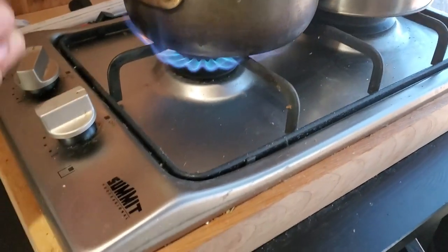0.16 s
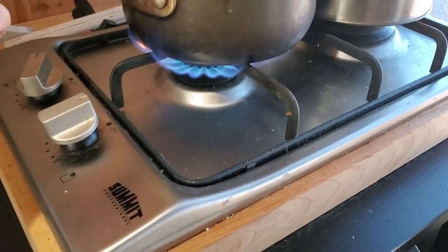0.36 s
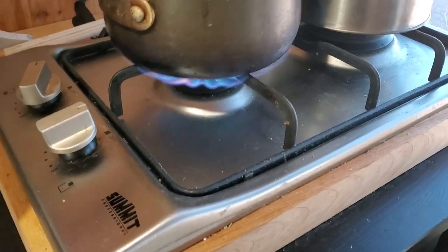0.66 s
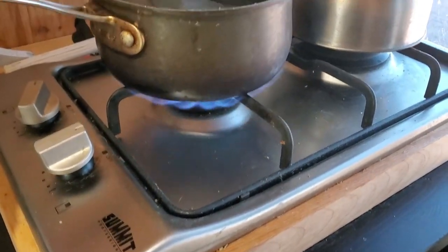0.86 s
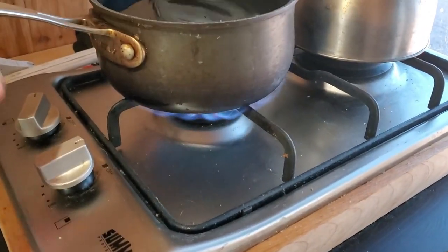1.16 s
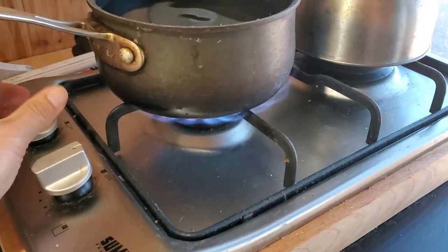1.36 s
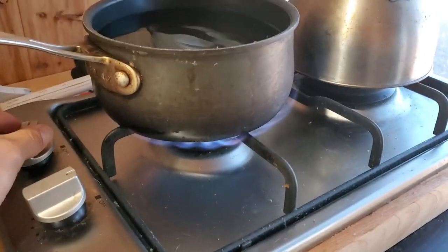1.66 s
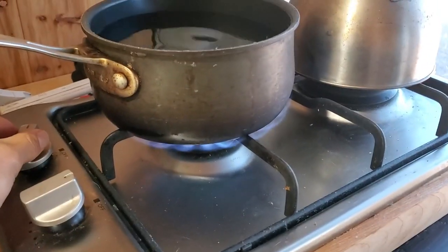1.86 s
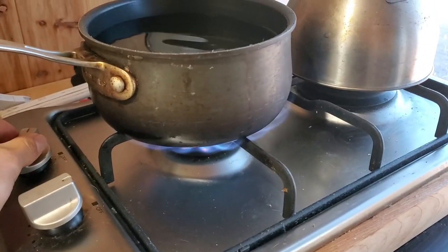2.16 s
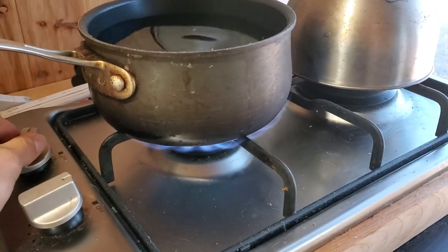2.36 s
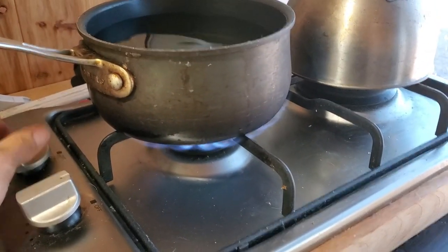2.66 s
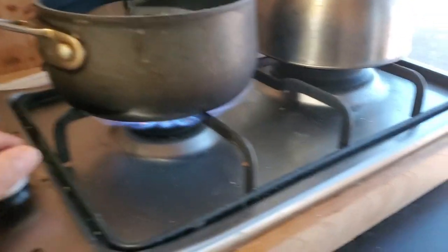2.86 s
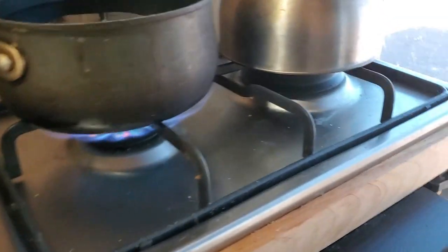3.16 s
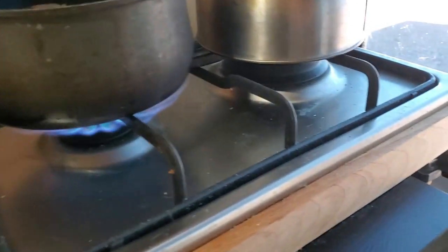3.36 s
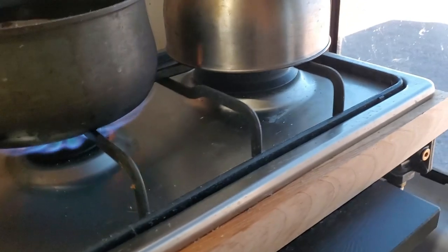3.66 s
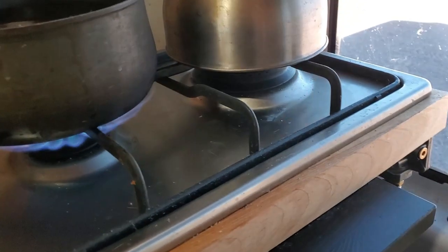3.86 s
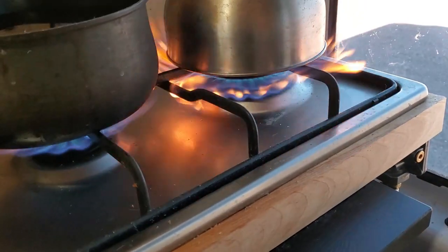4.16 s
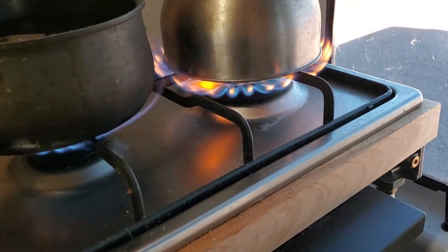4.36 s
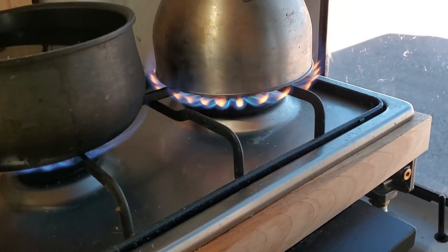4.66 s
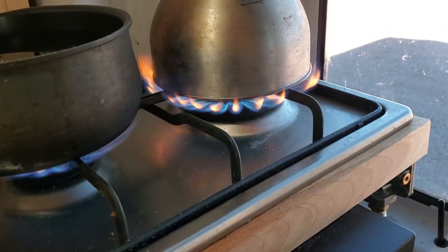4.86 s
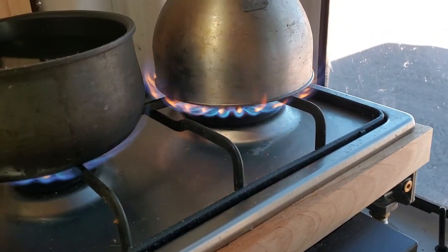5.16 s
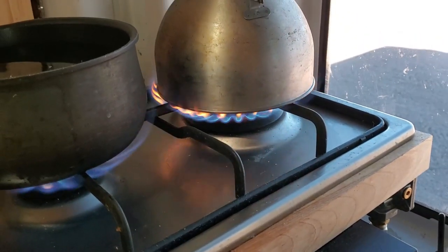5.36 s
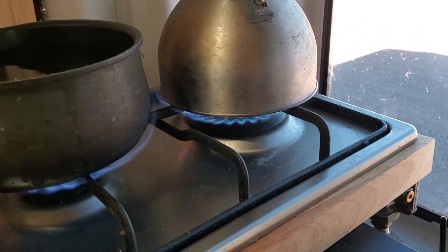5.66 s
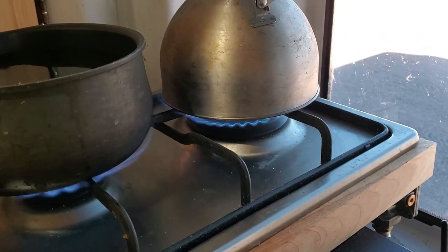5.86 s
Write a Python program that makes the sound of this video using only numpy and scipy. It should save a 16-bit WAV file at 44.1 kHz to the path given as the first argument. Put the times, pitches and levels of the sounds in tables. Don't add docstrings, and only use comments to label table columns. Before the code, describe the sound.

In a small wooden cabin, close to a gas hob, a burner gives a low fluttering rumble and faint hiss. Early hard knocks on wood ring a metal support, with a short scrape. A knob is pushed and turned with dull clunks; six sharp igniter cracks follow, gas hisses and lights with a soft whoomp. The new jet roars hollowly, then a thin whistle marks it being turned down to low flame.

```python
import sys
import numpy as np
from scipy import signal
from scipy.fft import rfft, irfft, next_fast_len
from scipy.io import wavfile
from scipy.ndimage import uniform_filter1d, map_coordinates

SR = 44100
rng = np.random.default_rng(int(sys.argv[2]) if len(sys.argv) > 2 else 0)


def transcribe(signal):
    frames = np.atleast_2d(signal).T
    limited = np.clip(frames, -1, 1)
    pcm = np.round(limited * 32767).astype(np.int16)
    wavfile.write(sys.argv[1], SR, pcm)


def makeup_ratio(level_db):
    decades = np.asarray(level_db, float) / 20
    return 10 ** decades


N = 264688
SIZE = next_fast_len(N)
FREQS_HZ = np.maximum(np.arange(SIZE // 2 + 1) * SR / SIZE, 1)

# frequency in Hz, side minus mid in dB.
WIDTH = [(30, -22), (60, -19), (120, -15), (250, -11), (500, -6), (1200, -1), (2400, 1), (5000, 0),
         (15000, 0)]

# frequency in Hz, density in dB per Hz.
RUMBLE = [(12, -47.5), (20, -14.5), (54, -0.5), (75, -1.5), (114, -8.5), (129, -15), (156, -13.5),
          (256, -25.5), (295, -24), (412, -45.5), (900, -51), (1170, -80), (1980, -120)]
HISS = [(300, -19.5), (900, -17.5), (1400, -18.5), (2600, -23), (5000, -26.5), (7000, -18.5), (9500, -20.5),
        (11000, -29.5), (14000, -24), (15600, -20.5), (17000, -29)]
TONE_FLOOR = [(1000, -51.5), (3000, -52)]
# frequency in Hz, width in Hz, level in dB.
HISS_PEAKS = [(3910, 510, -14), (6010, 160, -16), (9000, 1300, -13), (7560, 82, -23.5)]
TONE_PEAKS = [(1798, 124, 0.69)]
# time in seconds, distance in metres.
DISTANCE = [
    (0, 0.64),
    (.45, 0.33),
    (1.1, 0.4),
    (2.0, 0.4),
    (2.8, 0.6),
    (3.2, 0.19),
    (3.45, 0.81),
    (4.2, 0.56),
    (4.7, 0.7),
    (6.0, 0.92),
]
TONE_SINGS = (.45, .45, 1.955, .03)
LEAK = (2.24, 0.063, 0.21, 0.2)
HIGH_TONE_SINGS = (2.86, .04, 0.37, .15)
RUMBLE_DB, HISS_DB = -56, -74
HISS_FOLLOWS = 0.22
TONE_DB, TONE_MUTED_DB, TONE_SAG_DB_PER_S = -68.5, -15, 2.5
LEAK_DB, HIGH_TONE_DB = 2.5, -74.5

# time in seconds, level in dB, contact in seconds, bass in dB, body top in Hz.
KNOCKS = [
    (0.189, -60, 0.05, 11.5, 505),
    (0.244, -30.5, 0.027, 0, 4300),
    (0.266, -32, 0.01, -0.5, 5540),
    (0.31, -48, 0.016, 6.5, 4450),
    (1.026, -40, 0.016, 2.5, 3040),
    (1.356, -40.5, 0.024, -2.5, 900),
]
# frequency in Hz, level in dB, t60 in seconds.
WOOD = [(239.3, 1, 0.16), (313.8, 7, 0.15), (669, 0.5, 0.093), (1060, -2.5, 0.15), (2040, -5.5, 0.13),
        (3345, -6.5, 0.098)]
# low edge in Hz, high edge in Hz, level in dB.
WOOD_BANDS = [(360, 532, 10), (542, 590, 8.5), (900, 1190, 11.5), (1360, 1620, 6.5), (1760, 2140, 6.5),
              (3030, 3600, -1.5), (4130, 7700, -8)]

# time in seconds, frequency in Hz, level in dB, t60 in seconds.
PAN_SUPPORT = [
    (0.25, 2160, -40.5, 0.43),
    (0.25, 2720, -50, 0.43),
    (1.03, 640, -54.5, 0.36),
]

SLIDE = (0.28, .2, .26, 0.15)
# frequency in Hz, density in dB per Hz.
SLIDING = [(88, -34), (150, -4), (298, -1.5), (524, -23.5), (655, -15), (846, -20.5), (1190, -14.5),
           (1410, -22.5), (1800, -18.5), (2370, -24.5), (2530, -51), (3170, -32.5), (4460, -42.5),
           (6730, -32), (9000, -58), (11700, -75), (19800, -120)]
# frequency in Hz, width in Hz, level in dB.
SLIDE_PEAKS = [(301, 50, 2.0), (1180, 66, -16), (1790, 17, -7.5), (6640, 1800, -30.5)]
SLIDE_DB = -48.5

# time in seconds, level in dB, t60 in seconds, wide hiss in dB.
PUFFS = [
    (1.355, -67.5, 0.16, 6),
    (1.5, -68, .1, -7),
    (2.985, -54, 0.18, -15.5),
]
PUFF_LOW_HZ, PUFF_HIGH_HZ = 6292, 8400

# time in seconds, level in dB, contact in seconds, bass in dB, body top in Hz.
KNOB = [
    (2.8595, -37.5, 0.0027, 0.5, 4450),
    (2.866, -36, .025, 5.5, 2900),
    (3.092, -37, 0.037, 6.5, 700),
    (3.137, -27.5, 0.0094, -21.5, 2800),
    (3.15, -24.5, 0.014, -3, 2700),
    (3.172, -39.5, .02, 2.5, 2560),
    (3.25, -40.5, 0.02, -3, 2840),
    (4.44, -56, 0.036, 6.5, 900),
]
# frequency in Hz, level in dB, t60 in seconds.
HOB = [(111.6, -2, 0.055), (151, -1.5, 0.023), (190.9, 4, 0.086), (323.5, 6.5, 0.077), (690, -10.5, 0.064),
       (1036, -1.5, 0.11), (1428, -13, 0.02)]
# low edge in Hz, high edge in Hz, level in dB.
HOB_BANDS = [(400, 770, 12.5), (900, 1700, 9.5), (1580, 2350, 0.5), (2700, 9600, 8.5)]

# time in seconds, level in dB, colour at 6.5 kHz in dB, colour at 11 kHz in dB.
SPARKS = [
    (3.2102, -20.5, 2.5, -2),
    (3.4437, -20, 4, 1),
    (3.6777, -21.5, 2, -2),
    (3.9112, -19.5, 5, -1),
    (4.144, -22, -2.1, 2),
    (4.378, -26, -2, 4),
]
# frequency in Hz, density in dB per Hz.
CRACK = [(300, -61), (600, -18), (1000, -14), (1500, -14.5), (2800, -10), (4500, -10), (6400, -4.5),
         (8000, -8.5), (10000, -1), (13000, -5), (16500, -10)]
# frequency in Hz, left minus right in dB.
LEFT_LEAD = [(1000, 2.5), (3000, -3), (6500, 8.5), (10000, 2), (14000, 7)]
# frequency in Hz, level in dB, t60 in seconds.
SPARK_MODES = [(6120, -52, 0.12), (6660, -45, 0.09), (7070, -51, 0.12), (9970, -45, 0.045),
               (10670, -45, 0.03)]

# time in seconds, gas flow in dB.
FLOW = [
    (3.35, -39.5),
    (3.49, -19.5),
    (3.61, -5.5),
    (3.83, -1.5),
    (4.08, -0.5),
    (4.67, -1.5),
    (5.12, -2),
    (5.2, -5),
    (5.3, -11.5),
    (6.0, -13.5),
]
# frequency in Hz, density in dB per Hz.
ROAR = [(240, -61.5), (400, -20.5), (528, -27.5), (716, -9.5), (1120, -0.5), (1350, -15), (1900, -17.5),
        (2140, -39), (2370, -39), (3000, -30.5), (3900, -53.5), (6600, -120)]
JET_HISS = [(3000, -17.5), (4300, -24), (5200, -35), (6500, -14.5), (9000, -24.5), (11500, -11.5),
            (14000, -21), (16500, -25.5)]
# frequency in Hz, width in Hz, level in dB.
ROAR_PEAKS = [(1143, 76, 6.5), (988, 130, 0), (1850, 500, -13.5)]
JET_PEAKS = [(6730, 70, -2), (11230, 130, -5), (11750, 68, -13.5), (13580, 120, -6), (4300, 261, -8)]
ROAR_DB, JET_HISS_DB = -58.5, -64.5
JET_HISS_FOLLOWS, JET_HISS_LAG_S = 3.1, .09

# start, attack, hold, release in seconds, level in dB.
WHISTLES = [
    (3.738, .08, .07, .015, -57.5),
    (5.175, 0.027, 0.08, 0.047, -54.5),
]
WHISTLE_HZ = (11400, 11230)
WHISTLE_RATIOS = (1, 1.022, .645)
WHISTLE_SAG_HZ_PER_S, NEIGHBOUR_FADE_DB_PER_S = 2100, 113.5

WHOOSH = (3.9, .032, .173, .03)
# frequency in Hz, density in dB per Hz.
THUMP = [(22, -40.5), (38, -15.5), (70, 0.6), (108, 2.0), (160, -4.5), (300, -18.0), (600, -44.5)]
FLUTTER = [(120, -29), (250, -8.5), (600, 6.5), (1100, 1.5), (2000, -7.5), (4000, -19.5), (8000, -30)]
RUSH = [(800, -15), (2000, -7.0), (4000, 6.5), (7000, -12.0), (12000, -24)]
THUMP_DB, FLUTTER_DB, RUSH_DB, RUSH_SAG_DB_PER_S = -30, -41.5, -45.5, 88
THROB_HZ, THROB_PEAK_S, THROB_DB = 11, 3.88, 3


def in_time(rows, quiet=None):
    s, *columns = np.transpose(rows)
    return [np.interp(np.arange(N) / SR, s, c, quiet, quiet) for c in columns]


def at_hz(points, hz):
    points = np.array(points)
    return np.interp(np.log(hz), np.log(points[:, 0]), points[:, 1])


def stroke(start_s, attack_s, hold_s, release_s, depth_db):
    t = np.arange(N) / SR - start_s
    rise = t / attack_s - 1
    fall = (attack_s + hold_s - t) / release_s
    return depth_db * np.minimum(np.minimum(rise, fall), 0)


def drift(rate_hz):
    knots = rng.standard_normal(400)
    return map_coordinates(knots, [np.arange(N) / SR * min(rate_hz, 60)], order=3)


def band(x, low_hz, high_hz):
    return signal.sosfilt(signal.butter(2, [low_hz, min(high_hz, SR / 2.2)], "band", fs=SR, output="sos"), x)


def ring(x, hz, t60_s):
    r = makeup_ratio(-60 / (t60_s * SR))
    w = 2 * np.pi * hz / SR
    return signal.lfilter([0, np.sin(w)], [1, -2 * r * np.cos(w), r * r], x)


def add(out, s, sound, pan_db):
    at = round(s * SR)
    panned = sound * makeup_ratio([[pan_db / 2], [-pan_db / 2]])
    out[:, at:at + sound.shape[1]] += panned[:, :N - at]


def gas_noise(spectrum, peaks=(), flicker_db=-1.0, rate_hz=11.0, split_hz=1500):
    power = makeup_ratio(at_hz([(5, -90)] + list(spectrum) + [(22000, -90)], FREQS_HZ)) ** 2
    for hz, width_hz, top_db in peaks:
        power = power + makeup_ratio(top_db) ** 2 / (1 + (2 * (FREQS_HZ - hz) / width_hz) ** 2) ** 2
    white = rfft(rng.standard_normal((2, SIZE))) * np.sqrt(power)
    side_gain = makeup_ratio(at_hz(WIDTH, FREQS_HZ))
    whole = irfft(white * [np.ones_like(FREQS_HZ), side_gain], SIZE)[:, :N]
    lows = signal.lfilter(*signal.butter(1, split_hz, fs=SR), whole)
    low_part = lows * makeup_ratio(flicker_db * drift(rate_hz))
    high_part = (whole - lows) * makeup_ratio(flicker_db * drift(rate_hz))
    mid, side = (low_part + high_part) / np.std(whole[0])
    return np.array([mid + side, mid - side])


def struck_body(events, modes, bands, tail_db, tail_s, snap_s, snap_db, soften_db, rise_s):
    out, t = np.zeros((2, N)), np.arange(round(.45 * SR)) / SR
    for s, level_db, contact_s, bass_db, top_hz in events:
        mid, side = rng.standard_normal((2, len(t)))
        sides = side * [[1], [-1]]
        contact_s = max(contact_s, .002)
        treble_db = snap_db - soften_db * np.log2(contact_s / 0.011) + 3.7 * np.log2(top_hz / 3000)
        force = np.minimum(t / np.minimum(rise_s, contact_s / 4), 1) * np.exp(-t / contact_s)
        swell = makeup_ratio(tail_db) * (contact_s / .02) ** .3 * np.minimum(t / 0.006, 1)
        body = np.zeros((2, len(t)))
        for hz, mode_db, t60_s in modes:
            wide = np.clip(hz / 1500, 0, 1)
            body += makeup_ratio(mode_db + bass_db * (hz < 400)) * ring(force * (mid + wide * sides), hz, t60_s)
        body /= np.sqrt(contact_s * SR)
        body_drive = force + swell * makeup_ratio(-60 * t / tail_s)
        for low_hz, high_hz, band_db in bands:
            ears = mid + np.clip(low_hz / 1300, 0, 1) * sides
            body += makeup_ratio(band_db) * band(ears * body_drive, low_hz, high_hz)
        body = signal.sosfilt(signal.butter(5, top_hz, fs=SR, output="sos"), body)
        snap_drive = force + swell * (contact_s / .02) ** 0.49 * makeup_ratio(-60 * t / snap_s)
        snap = band((mid + sides) * snap_drive, 2000, 16500)
        add(out, s, makeup_ratio(level_db) * (body + makeup_ratio(treble_db) * snap), 1.5)
    return out


def lit_burner():
    near_db = -20 * np.log10(in_time(DISTANCE)[0])
    sung_db = stroke(*TONE_SINGS, depth_db=-TONE_MUTED_DB) - TONE_SAG_DB_PER_S * np.arange(N) / SR
    tone_db = TONE_DB + np.maximum(sung_db, TONE_MUTED_DB)
    leak_db = sum(np.maximum(LEAK_DB + stroke(*shape, depth_db=LEAK_DB), 0)
                  for shape in (LEAK, HIGH_TONE_SINGS))
    hiss_db = HISS_DB + HISS_FOLLOWS * near_db + leak_db
    high_db = HIGH_TONE_DB + stroke(*HIGH_TONE_SINGS, depth_db=11)
    rumble = makeup_ratio(RUMBLE_DB + near_db) * gas_noise(RUMBLE, flicker_db=0.84, split_hz=120)
    tone = makeup_ratio(tone_db) * gas_noise(TONE_FLOOR, TONE_PEAKS, flicker_db=3.2)
    high_tone = makeup_ratio(high_db) * band(rng.standard_normal((2, N)), 3850, 4150) * 9.0
    hiss = makeup_ratio(hiss_db) * gas_noise(HISS, HISS_PEAKS, flicker_db=2.96, split_hz=3000)
    return rumble + hiss + tone + high_tone


def wood_knocks():
    return struck_body(KNOCKS, WOOD, WOOD_BANDS, tail_db=-3.0, tail_s=0.25, snap_s=0.21, snap_db=-37,
                       soften_db=1.5, rise_s=0.0014)


def pan_support():
    out, t = np.zeros((2, N)), np.arange(round(.45 * SR)) / SR
    for s, hz, level_db, t60_s in PAN_SUPPORT:
        sine = np.sin(2 * np.pi * hz * t + np.array([[0], [1.3]]))
        add(out, s, makeup_ratio(level_db - 60 * t / t60_s) * sine, 1.5)
    return out


def slide():
    friction = gas_noise(SLIDING, SLIDE_PEAKS, flicker_db=1.9, rate_hz=8.53, split_hz=320)
    return makeup_ratio(SLIDE_DB + stroke(*SLIDE, depth_db=17)) * friction


def short_puffs():
    out, t = np.zeros((2, N)), np.arange(round(.45 * SR)) / SR
    for s, level_db, t60_s, wide_db in PUFFS:
        decay = makeup_ratio(level_db + 5.5 - 60 * t / t60_s) * np.minimum(t / 0.0054, 1)
        puff = rng.standard_normal((2, len(t))) * decay
        narrow = band(puff, PUFF_LOW_HZ, PUFF_HIGH_HZ)
        add(out, s, narrow + makeup_ratio(wide_db) * band(puff, 2000, 16000), 3.0)
    return out


def knob():
    return struck_body(KNOB, HOB, HOB_BANDS, tail_db=-6, tail_s=.19, snap_s=0.17, snap_db=-8,
                       soften_db=8.5, rise_s=0.004)


def sparks():
    out, t = np.zeros((2, N)), np.arange(round(.3 * SR)) / SR
    walls = rng.standard_normal((2, len(t)))
    hz = np.maximum(np.arange(len(t) // 2 + 1) * SR / len(t), 1)
    sides = makeup_ratio(at_hz(LEFT_LEAD, hz) * [[.5], [-.5]])
    near = np.minimum(t / 0.0004, 1) * makeup_ratio(-60 * t / 0.021)
    tail = np.minimum(t / 0.0022, 1) * makeup_ratio(-9.0 - 60 * t / 0.25 - 1000 * t ** 2)
    crack = np.minimum(t / .0004, 1) * makeup_ratio(2.0 - 60 * t / .004)
    for s, level_db, *colour_db in SPARKS:
        echoes = 0.77 * walls + 0.68 * rng.standard_normal((2, len(t)))
        own_db = at_hz([(3000, 0)] + list(zip((6500, 11000), colour_db)), hz)
        echoes = irfft(rfft(echoes) * makeup_ratio(at_hz(CRACK, hz) + own_db) * sides, len(t))
        lumps = makeup_ratio(2.2 * rng.standard_normal((2, len(t) // 16 + 1)))
        lumps = lumps.repeat(16, axis=1)[:, :len(t)]
        duller = signal.lfilter(*signal.butter(1, 9000, fs=SR), echoes)
        cabin_tail = (duller + (echoes - duller) * makeup_ratio(-60 * t / 0.17)) * tail
        sound = echoes * (near * lumps + crack) + cabin_tail
        for mode_hz, mode_db, t60_s in SPARK_MODES:
            sound += makeup_ratio(mode_db) * ring(echoes * near, mode_hz, t60_s)
        add(out, s, makeup_ratio(level_db + 11.0) * sound, 0)
    return out


def jet():
    flow_db, = in_time(FLOW, quiet=-69)
    late_db, = in_time(np.add(FLOW, [JET_HISS_LAG_S, 0]), quiet=-60)
    roar = makeup_ratio(ROAR_DB + flow_db) * gas_noise(ROAR, ROAR_PEAKS, flicker_db=2.0, rate_hz=21.0)
    hiss_db = JET_HISS_DB + JET_HISS_FOLLOWS * late_db
    hiss = makeup_ratio(hiss_db) * gas_noise(JET_HISS, JET_PEAKS, flicker_db=-3.5)
    return roar * makeup_ratio([[-1.5], [1.5]]) + hiss


def whistles():
    out = np.zeros((2, N))
    for (*shape, level_db), start_hz in zip(WHISTLES, WHISTLE_HZ):
        t = np.clip(np.arange(N) / SR - shape[0], 0, 1)
        hz = start_hz - WHISTLE_SAG_HZ_PER_S * t
        wavering_db = level_db + stroke(*shape, depth_db=22) + 1.2 * drift(40)
        level = uniform_filter1d(makeup_ratio(wavering_db), size=400)
        shares_db = (0, 4 - NEIGHBOUR_FADE_DB_PER_S * t, -17.5)
        for ratio, share_db in zip(WHISTLE_RATIOS, shares_db):
            phase = 2 * np.pi * np.cumsum(ratio * hz + 12 * drift(30)) / SR
            out += np.sqrt(2) * level * makeup_ratio(share_db) * np.sin(phase + np.array([[0], [1.2]]))
    return out


def whoosh():
    t, burn_db = np.arange(N) / SR, stroke(*WHOOSH, depth_db=31.5)
    throb_db = THROB_DB * np.cos(2 * np.pi * THROB_HZ * (t - THROB_PEAK_S))
    lumps = drift(45)
    thump_db = THUMP_DB + burn_db + throb_db
    flutter_db = FLUTTER_DB + burn_db - throb_db + 1.2 * lumps
    sag_db = RUSH_SAG_DB_PER_S * np.maximum(t - WHOOSH[0], 0)
    rush_db = RUSH_DB + burn_db - sag_db + 2.5 + 1.5 * lumps
    thump = makeup_ratio(thump_db) * gas_noise(THUMP, split_hz=78)
    flutter = makeup_ratio(flutter_db) * gas_noise(FLUTTER, flicker_db=2.0, rate_hz=74.0, split_hz=820)
    rush = makeup_ratio(rush_db) * gas_noise(RUSH)
    return thump + flutter + rush


def scene():
    cabin = lit_burner() + wood_knocks() + pan_support() + slide()
    ignition = short_puffs() + knob() + sparks() + jet() + whistles() + whoosh()
    return cabin + ignition


def low_pass(x):
    return signal.sosfilt(signal.butter(12, 16990, fs=SR, output="sos"), x)


def record(dry):
    shelved = signal.sosfilt(signal.ellip(6, .5, 28, 15850, fs=SR, output="sos"), dry)
    bass_cut = signal.lfilter(*signal.butter(2, 30, "high", fs=SR), shelved)
    rounded = .95 * np.tanh(bass_cut / .95)
    return low_pass(rounded)


dry = scene()
out = record(dry)
transcribe(out)
```